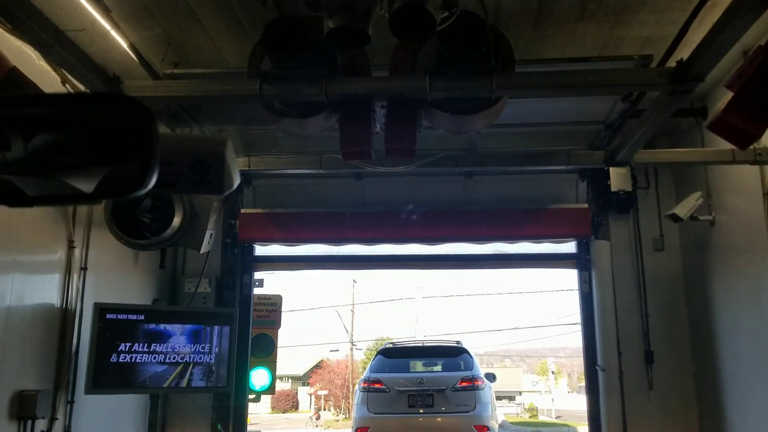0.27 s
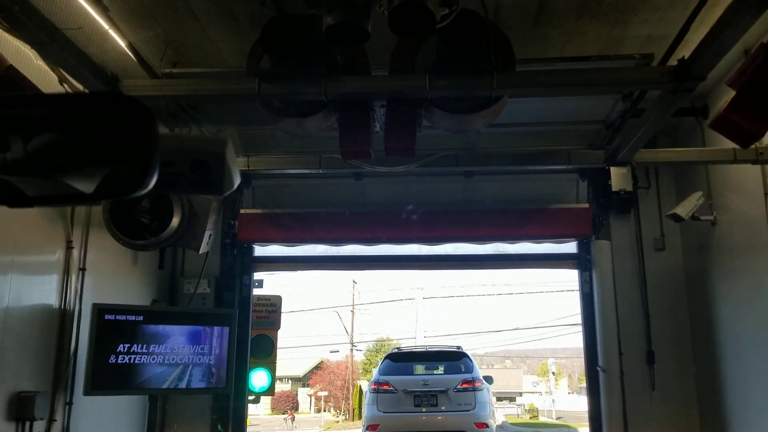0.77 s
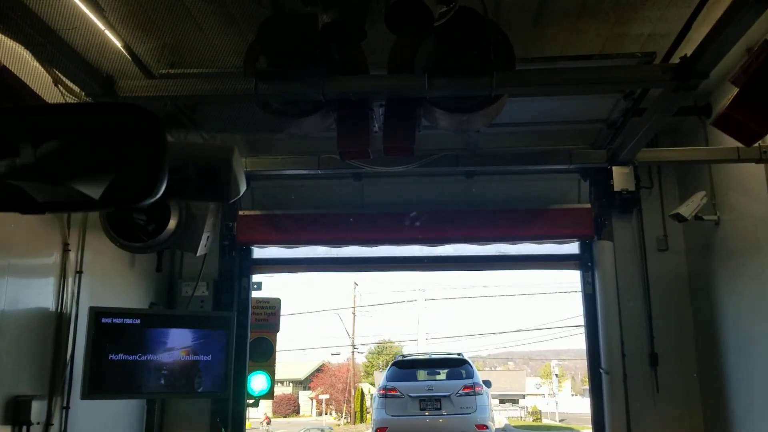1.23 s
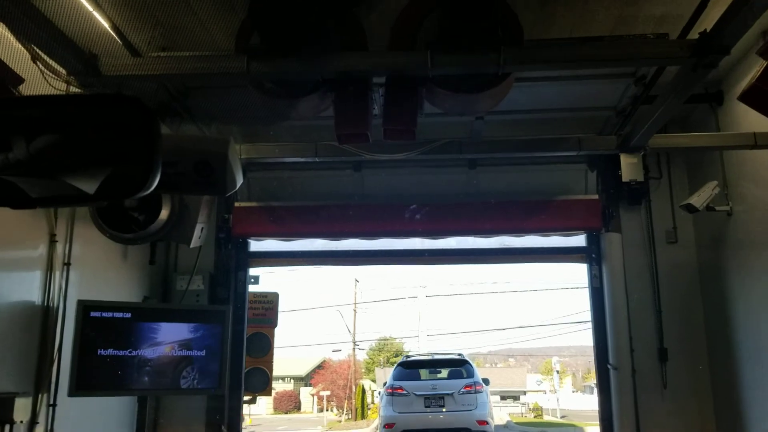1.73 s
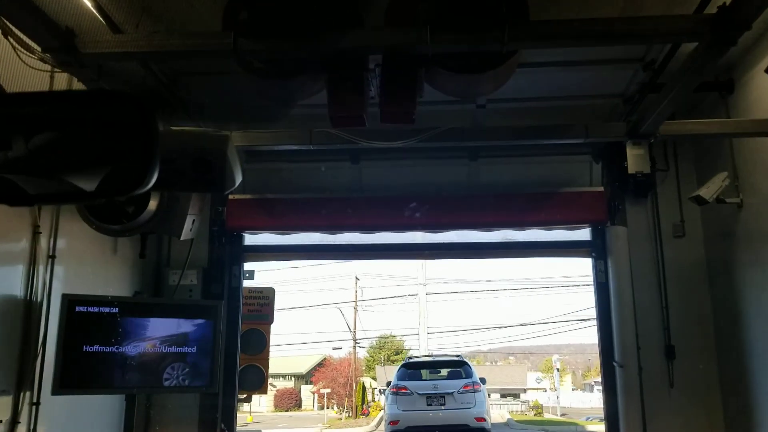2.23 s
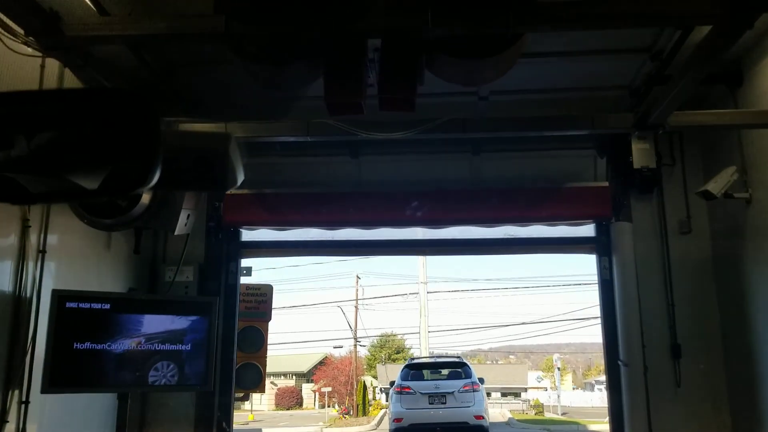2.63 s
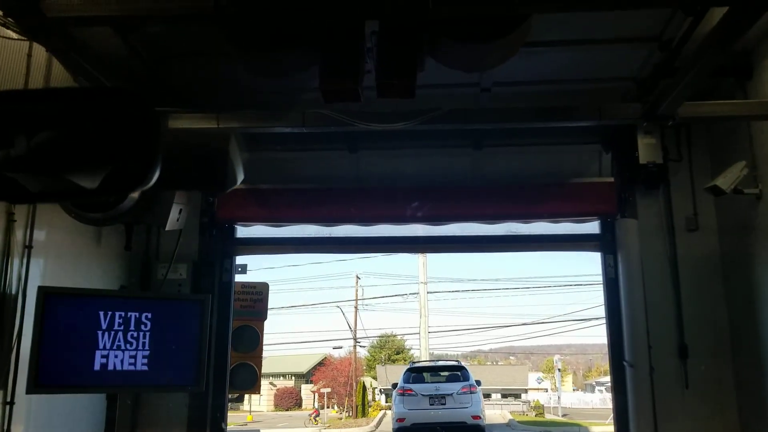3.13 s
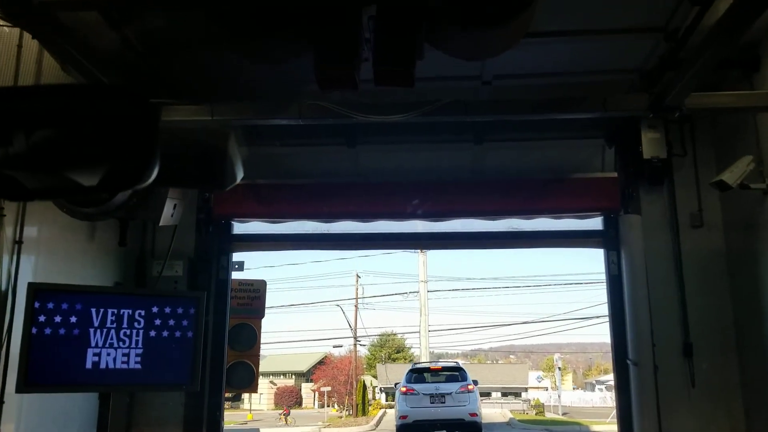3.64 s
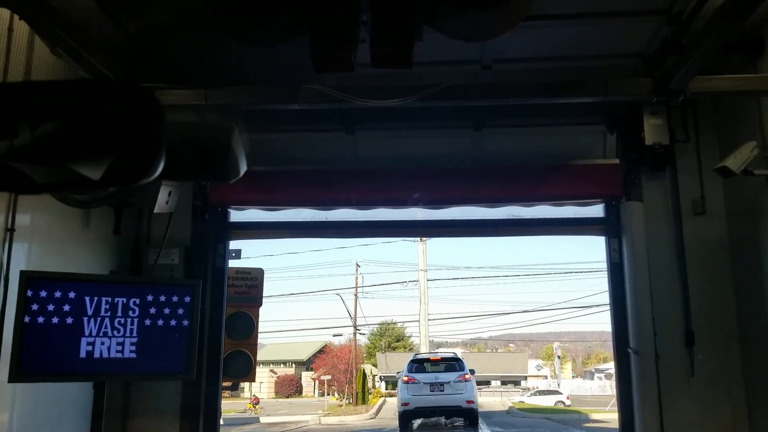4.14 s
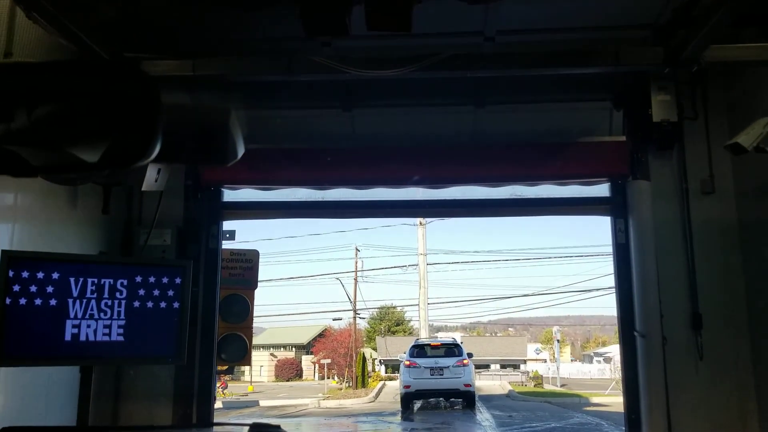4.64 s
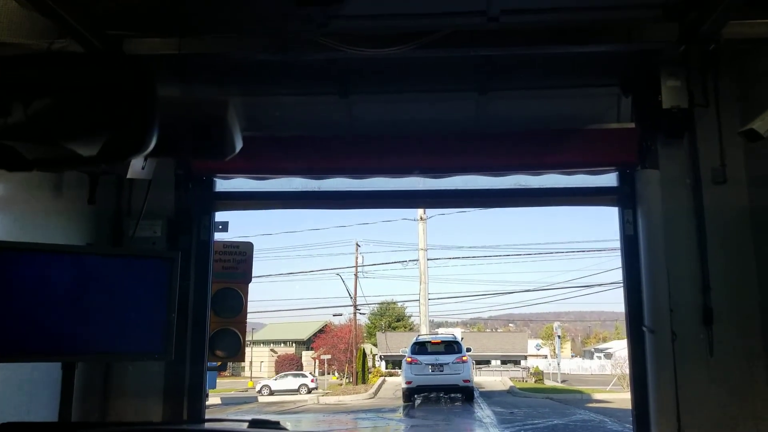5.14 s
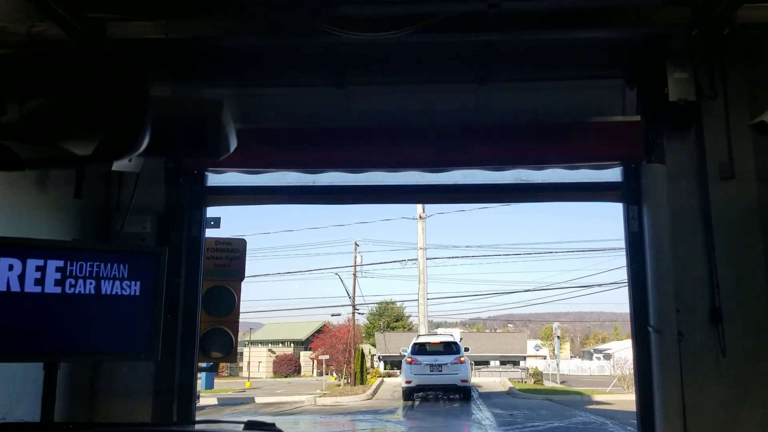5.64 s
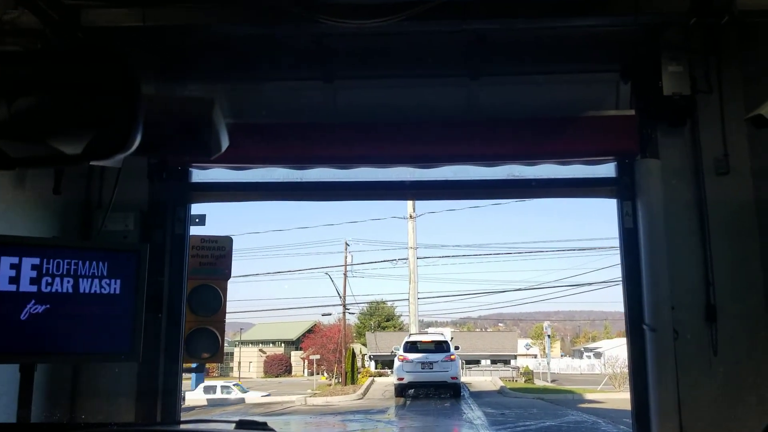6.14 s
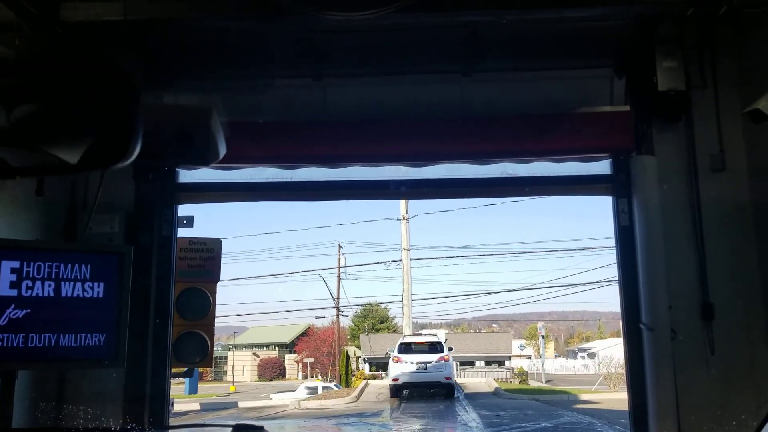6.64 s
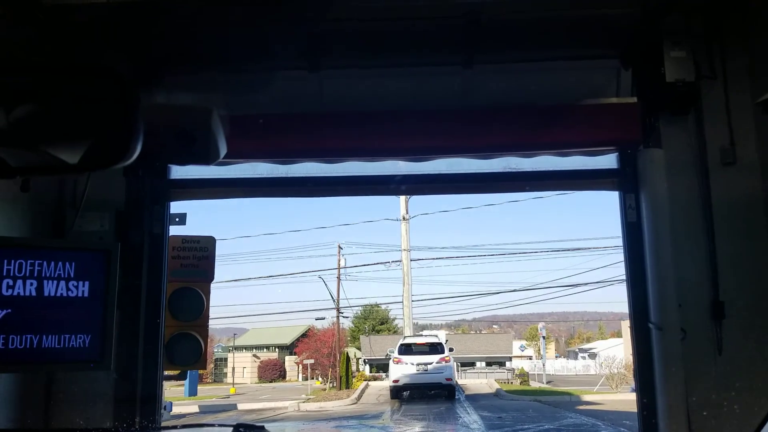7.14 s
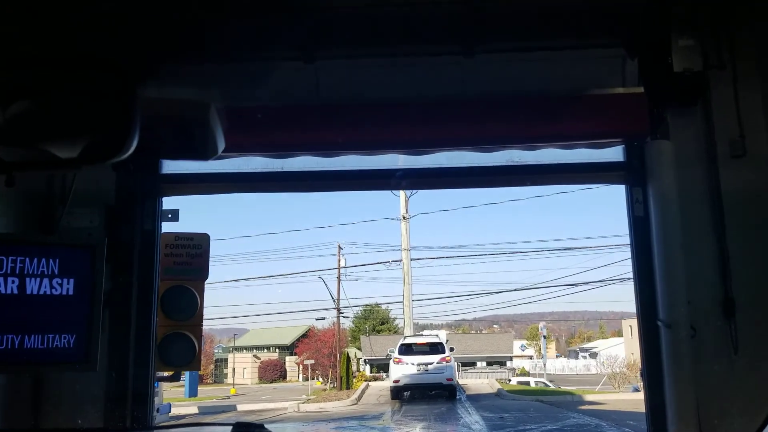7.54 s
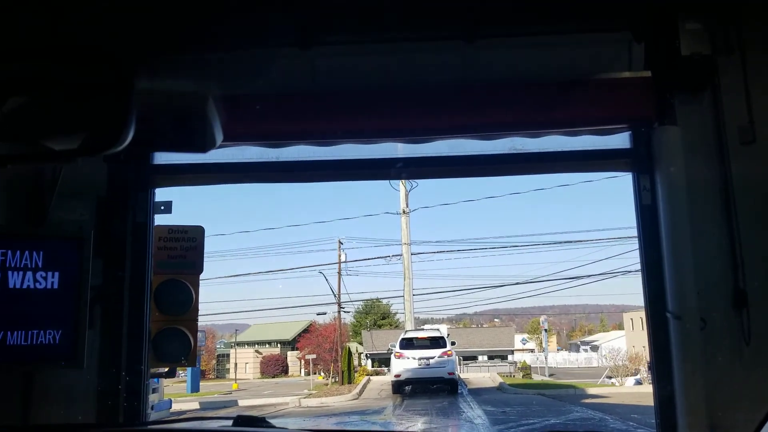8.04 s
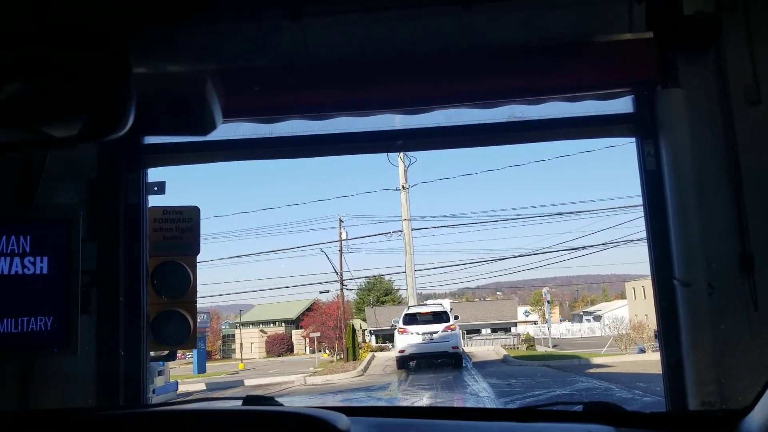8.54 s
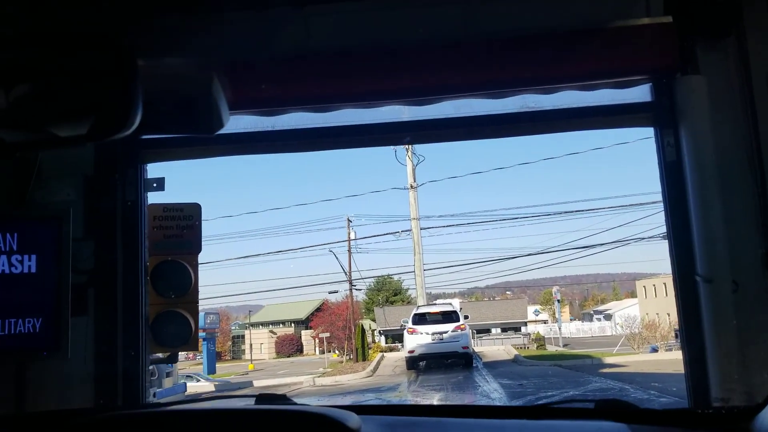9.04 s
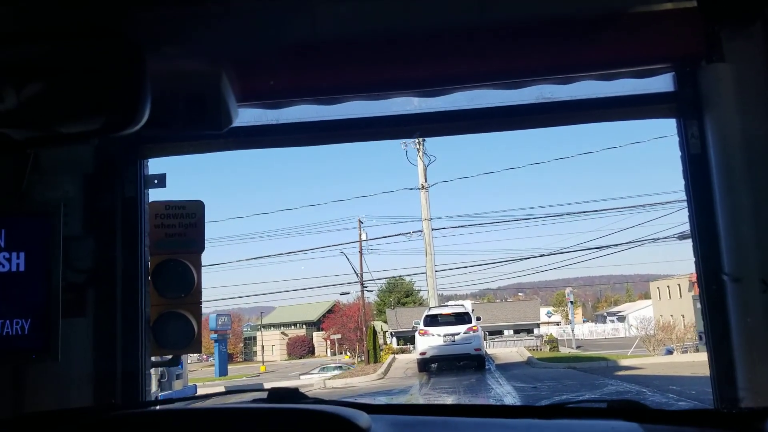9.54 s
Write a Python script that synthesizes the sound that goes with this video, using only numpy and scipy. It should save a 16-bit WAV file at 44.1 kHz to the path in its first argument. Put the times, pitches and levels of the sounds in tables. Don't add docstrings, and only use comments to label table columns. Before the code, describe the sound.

Heard inside a car creeping out of a wash tunnel: deep turbulent dryer air booms and drums on roof and glass, with a pulsing mid-low fan hum and faint droplet hiss. Loose keys tinkle. Small knocks lead to a hard thump just past five seconds, after which the sound dips and recovers. Keys jingle in a flurry, then final jolts rattle the body. Close, enclosed phone microphone on the dashboard.

```python
import sys
import numpy as np
from scipy import signal
from scipy.fft import rfft, irfft, next_fast_len
from scipy.io import wavfile
from scipy.ndimage import uniform_filter1d

SR = 44100
rng = np.random.default_rng(int(sys.argv[2]) if len(sys.argv) > 2 else 0)


def digitize_waveform(pressure):
    field = np.atleast_2d(pressure).T
    bounded = np.clip(field, -1, 1)
    quanta = np.round(bounded * 32767).astype(np.int16)
    wavfile.write(sys.argv[1], SR, quanta)


def level_to_linear(level):
    exponent = np.asarray(level, float) / 20
    return 10 ** exponent


N = 431738
TIME = np.arange(N) / SR


def curves(table):
    s, *columns = np.transpose(table)
    return [np.interp(TIME, s, column) for column in columns]


def over_hz(table, hz, column=1):
    rows = np.transpose(table)
    return np.interp(np.log(hz + 1), np.log(rows[0] + 1), rows[column])


def unit(x):
    return x / np.sqrt(np.mean(x ** 2))


def band(x, lo_hz, hi_hz):
    return signal.sosfilt(signal.butter(2, [lo_hz, hi_hz], "band", fs=SR, output="sos"), x)


def lowpass(x, cutoff_hz):
    return signal.sosfilt(signal.butter(3, cutoff_hz, fs=SR, output="sos"), x)


def walk(rate_hz):
    hold = int(SR / rate_hz)
    steps = np.repeat(rng.standard_normal(N // hold + 1), hold)
    slewed = uniform_filter1d(uniform_filter1d(steps, hold), hold)
    return unit(slewed[:N])


def humps(rows):
    coarse = TIME[::64]
    total = sum(gain * np.exp(-((coarse - s) / length) ** 2) for s, gain, length in rows)
    return np.interp(TIME, coarse, total)


def ring(x, hz, t60):
    pole = np.exp(2j * np.pi * hz / SR - np.log(1000) / (t60 * SR))
    return signal.lfilter([1], [1, -pole], x).imag


def ports(x, lean_db):
    late = np.interp(TIME - .0001, TIME, x)
    return np.array([x * level_to_linear(lean_db / 2), late * level_to_linear(-lean_db / 2)])


# start_s, depth_db, hold_s, recovery_s
DUCKS = [
    (-.5, -6.5, 0.84, 1.74),
    (5.31, -9.5, 0.91, 0.85),
]


def duck_db():
    attack_s = 0.19
    return sum(np.interp(TIME - s, np.cumsum([0, attack_s, hold, back]), [0, db, db, 0])
               for s, db, hold, back in DUCKS)


# time_s, roof_force_db, windscreen_aim_db, cabin_mode_hz
BLAST = [(0, 0, 0, 126), (.9, -1, 0, 125), (1.15, 1, 1, 125.8), (1.6, -0.5, 3, 129.4),
         (2.3, -0.5, 3, 137.5), (2.9, 1.5, 1, 150), (3.5, 1.5, -1, 161.2), (4.2, 3, -2.5, 149.3),
         (4.7, 0, -1, 150.1), (5.3, -0.5, -2, 152), (5.6, 0, 1, 142), (6.2, 0.5, 0, 142.6),
         (6.85, 1, 1.5, 148.1), (7.1, 0, 2, 156), (7.4, 0.5, 1, 165), (8.1, 0.5, 0.5, 166),
         (8.8, 1.5, -2, 162), (9.4, 0, -0.5, 160), (9.79, 0.5, 0, 168)]
# roof_force_db_per_db, windscreen_aim_db_per_db, gain_control_db_per_db
ANSWER = [
    (-.3, 0.94, 0.76),
    (0.36, 0.19, 0.88),
    (2.2, 0.075, 0.63),
    (0.89, 1, 0.51),
]


def regions_db():
    force, aim, _ = curves(BLAST)
    return np.array(ANSWER) @ np.array([force, aim, duck_db()])


# start_s, peak_db, left_minus_right_db
KEY_HITS = [(1.0306, -48, 4.5), (1.3453, -50.5, -3.5), (1.506, -50.5, -10), (2.2553, -46, -2),
            (2.3191, -37.5, -1), (2.678, -43.5, 0), (2.6903, -38.5, -1), (2.7357, -46.5, -3),
            (2.8933, -52, -2.5), (2.9342, -48, 3.5), (3.7648, -46.5, 3), (3.8492, -45, 2), (3.868, -49, 4),
            (3.888, -45, 0.5), (4.137, -45, -1), (4.4608, -54, -2.5), (4.775, -49, 0.5), (5.1612, -46, 3),
            (4.557, -47, -5.5), (4.614, -50.5, 9.5), (4.8075, -46, -2), (4.8339, -42, 3),
            (4.8748, -46, 3.5), (4.899, -44, -1), (5.6331, -45.5, -6), (5.6575, -44, -2),
            (6.5585, -50.5, 6), (7.1801, -41, 2), (7.195, -42, 1.5), (7.225, -46, 2), (7.33, -58, -1),
            (7.3881, -45, 1.5), (7.445, -50, 2), (7.4935, -53, 1), (7.5168, -42, -1.5), (7.533, -45, -1),
            (7.5887, -38.5, 0.5), (7.602, -42, -1), (7.634, -47, 0.5), (7.8511, -48, 2.5), (7.885, -48, 2),
            (7.93, -48, 0), (7.9902, -46, -1.5), (8.6986, -45, 1), (9.5766, -43, 6)]
# pitch_hz, level_db, t60_s
KEY_MODES = [(10700, -1, .008), (11600, -2, .008), (12200, 0, .008), (13000, -3, .006), (14000, -5, .005)]
# centre_s, level_db, length_s, pitch_hz
SQUEAKS = [(3.935, -62, .03, 10956), (3.98, -57, .025, 10956), (4.015, -63, .02, 10956),
           (4.06, -58, .015, 7200), (3.785, -58, .01, 8150), (3.865, -58, .008, 8200),
           (7.34, -57, .006, 8200), (7.635, -57, .006, 8200), (7.715, -56, .006, 8200),
           (7.755, -56, .008, 8200), (7.828, -55, .005, 8200), (7.855, -56, .005, 8200),
           (7.882, -55, .005, 8200)]


def keys():
    rattle_s, tick_db = .014, -16
    out = np.zeros((2, N))
    age = np.arange(SR // 10) / SR
    for s, db, lean_db in KEY_HITS:
        touches = rng.standard_normal((2, len(age))) * np.exp(-age / rattle_s)
        touches = touches * (rng.random(len(age)) < .08)
        touches[:, 0] = 1.5
        chime = sum(level_to_linear(g) * ring(touches, f * (1 + .008 * rng.standard_normal()), t60)
                    for f, g, t60 in KEY_MODES)
        hit = 1.8 * chime / np.abs(chime).max() + level_to_linear(tick_db) * band(touches, 5500, 15500)
        hit = hit * level_to_linear(db + np.array([[.5], [-.5]]) * lean_db)
        i = int(s * SR)
        out[:, i:i + len(age)] += hit[:, :N - i]
    squeaks = np.zeros(N)
    middle = age[-1] / 2
    for s, db, length, hz in SQUEAKS:
        i = int((s - middle) * SR)
        swell = level_to_linear(db) * np.exp(-((age - middle) / length) ** 2)
        squeaks[i:i + len(age)] += swell * np.sin(2 * np.pi * hz * TIME[i:i + len(age)])
    return out + ports(squeaks, .1)


# start_s, peak_db, rattle_s, contact_hardness_hz, scrape_db
JOLTS = [(4.461, -28, .008, 2400, -33), (4.557, -25, .012, 2400, -33), (4.711, -29, .01, 1500, -40),
         (4.787, -18, .012, 480, -51), (4.803, -19, .02, 520, -51), (5.291, -11, .008, 1700, -36),
         (5.302, -6.5, .016, 1300, -38), (5.316, -14, .014, 2000, -31), (5.330, -13, .014, 2300, -29),
         (5.349, -14, .016, 1200, -31), (5.364, -17, .02, 750, -36), (5.392, -20, .03, 540, -42),
         (5.426, -26, .03, 430, -45), (9.3, -24, 0.03, 700, -44.5), (9.627, -21, .03, 500, -47),
         (9.665, -21, .02, 800, -47), (9.688, -13, .01, 1000, -47), (9.701, -11, .013, 900, -47),
         (9.715, -14, .012, 1300, -47), (9.737, -13, .015, 1000, -45), (9.757, -14, .016, 850, -45),
         (9.775, -19, .015, 700, -47)]
# pitch_hz, level_db, t60_s
BODY = [(270, -18, .03), (370, -9, .03), (560, 1, .03), (700, -4, .03), (880, -4, .03), (1060, -6, .025),
        (1280, -10, .018), (1540, -10, .022), (1820, -12, .016), (2150, -13, .016), (2660, -21, .015)]


def jolts():
    out = np.zeros((2, N))
    age = np.arange(SR // 3) / SR
    for s, db, length, contact_hz, scrape_db in JOLTS:
        knocks = rng.standard_normal((2, len(age))) * (rng.random(len(age)) < .3)
        knocks[:, :16] = 0.2
        knocks[1] = 0.31 * knocks[0] + .5 * knocks[1]
        decay = np.exp(-(age / length) ** 2.4) + .3 * np.exp(-age / (1.4 * length))
        shape = np.minimum(.5 + age / .006, 1) * decay
        panels = sum(level_to_linear(g) * ring(knocks * shape, f * (1 + 0.024 * rng.standard_normal()), t60) / np.sqrt(t60)
                     for f, g, t60 in BODY)
        panels = lowpass(panels, contact_hz)
        peak = np.abs(band(panels.mean(axis=0), 500, 1500)).max()
        scrape = level_to_linear(scrape_db) * shape * unit(band(rng.standard_normal((2, len(age))), 2200, 6600))
        hit = level_to_linear(db) * (1.25 * panels / peak + scrape)
        i = int(s * SR)
        out[:, i:i + len(age)] += hit[:, :N - i]
    return out


# pitch_hz, level_db
SPRAY_COLOUR = [(5000, -28.5), (7000, -15.5), (8200, -2), (10000, -5.5), (11800, -3), (13500, -7.5),
                (15700, -7.5)]


def spray(jets_db):
    level_db, shaken_db, shaken_s = -56.5, 32, .018
    size = next_fast_len(N)
    drops = (rng.random((2, N)) < .3) * rng.standard_normal((2, N))
    drops = drops * level_to_linear(1.6 * rng.exponential(size=(2, N)))
    hz = np.arange(size // 2 + 1) * SR / size
    colour = level_to_linear(over_hz(SPRAY_COLOUR, hz)) * (hz > 4000)
    hiss = unit(irfft(rfft(drops, size) * colour, size)[:, :N])
    shakes = [(s, db - shaken_db) for s, db, _ in KEY_HITS]
    shakes += [(s + length / 2, db + scrape_db - 20.0) for s, db, length, _, scrape_db in JOLTS]
    shed = humps([(s + shaken_s / 2, level_to_linear(db), shaken_s) for s, db in shakes])
    steady = level_to_linear(level_db + 0.91 * jets_db + .3 * walk(3))
    return hiss * (steady + shed) * level_to_linear(.6 * walk(60) + np.array([[1.1], [-1.1]]))


# centre_s, level_db, length_s
IN_STEP = [(0.126, -29.5, 0.096), (0.494, -32, 0.62), (1.122, -26, 0.12), (1.36, -30, 0.089),
           (1.7, -19.5, 0.082), (2.157, -25, 0.15), (2.61, -22.5, 0.069), (2.98, -18, 0.14),
           (3.394, -18, 0.051), (3.622, -24.5, 0.025), (3.947, -24, 0.015), (4.19, -21, 0.036),
           (4.598, -22, 0.098), (4.986, -32.5, 0.16), (5.253, -24.5, 0.12), (5.747, -35.5, 0.14),
           (6.31, -32.5, 0.15), (6.707, -27, 0.15), (7.053, -24, 0.11), (7.296, -19, 0.073),
           (7.477, -18.5, 0.014), (7.71, -19.5, 0.11), (8.146, -25.5, 0.097), (8.375, -19, 0.01),
           (8.46, -20, 0.016), (8.606, -24, 0.033), (8.99, -31, 0.068), (9.383, -23, 0.1),
           (9.716, -23, 0.097)]


def blade_tone():
    blade_hz, between_swells_db = 468.5, -36
    phase = 2 * np.pi * np.cumsum(blade_hz + 1.164 * walk(4)) / SR + 0.38 * walk(8)
    size = level_to_linear(between_swells_db + 0.36 * duck_db() + 1.8 * walk(7.6))
    size = size + humps([(s, level_to_linear(db), length) for s, db, length in IN_STEP])
    overtone = level_to_linear(-28 + 2 * walk(6)) * np.sin(2 * phase)
    tone = np.sqrt(2) * size * (np.sin(phase) + overtone)
    half = uniform_filter1d(size, size=SR // 2) * level_to_linear(-4.0 + 2.4 * walk(3.2)) * np.sin(phase / 2)
    return ports(tone + half, 1.1)


def cabin_boom(boom_db):
    width_hz, level_db = 38.5, -19.5
    sway = lowpass(rng.standard_normal((2, N)), width_hz / 2)
    phase = 2 * np.pi * np.cumsum(curves(BLAST)[2]) / SR
    mode = unit(sway[0] * np.cos(phase) + sway[1] * np.sin(phase))
    return ports(mode * level_to_linear(level_db + 2.8 * boom_db), .1)


# pitch_hz, density_db_per_hz
ROAR = [(13, -41.5), (22, -6.5), (124, -4), (240, -5), (401, -7.5), (465, -9.5), (623, -17.5), (795, -23),
        (920, -20.5), (1090, -26), (1360, -29), (2380, -37.5), (4720, -41.5), (7500, -55.5), (9750, -84.5),
        (16500, -120)]
# pitch_hz, width_hz, lift_db
CABIN = [(117.3, 9, 8), (176, 33, 2.5), (228.6, 36, 2.5), (268.3, 12.5, 4.5), (536, 79, 4), (850, 65, -0.5),
         (1340, 110, 2.5)]
# pitch_hz, shared_part_0_to_1, left_lead_rad
ALIKE = [(30, .995, 0), (60, .975, 0), (130, .96, .02), (215, .86, .1), (390, .77, .5), (550, .7, .4),
         (680, .25, 1.5), (1100, .38, 3.0), (1500, .27, 3.1), (1900, .05, 3.1)]
# pitch_hz, left_minus_right_db
LEAN = [(60, 2), (110, 0), (200, 0), (380, 2.5), (700, 1.5), (1290, -0.5), (2380, -4), (4400, 0), (8120, 2),
        (15000, 3.5)]


def air_blast(regions):
    size = next_fast_len(N)
    hz = np.arange(size // 2 + 1) * SR / size
    colour_db = over_hz(ROAR, hz) + sum(db / (1 + (2 * (hz - f) / w) ** 2) for f, w, db in CABIN)
    shared, left, right = rfft(rng.standard_normal((3, size)))
    alike = np.clip(over_hz(ALIKE, hz), 0, 1)
    lag = np.exp(-1j * over_hz(ALIKE, hz, column=2))
    pair = np.sqrt(alike) * np.array([shared, shared * lag])
    pair = pair + np.sqrt(1 - alike) * np.array([left, right])
    pair = pair * level_to_linear(colour_db + np.outer([.5, -.5], over_hz(LEAN, hz)))
    swing = regions - regions.mean(axis=1, keepdims=True)
    region_hz = np.log([55, 140, 330, 1100])
    gust, out = walk(4.9), 0
    for centre in 20 * 2 ** (np.arange(19) / 2):
        mask = np.cos(np.pi / 2 * np.clip(2 * np.log2((hz + 1) / centre), -1, 1)) ** 2
        place = np.interp(np.log(centre), region_hz, np.arange(4))
        k = min(int(place), 2)
        follow = swing[k] + (place - k) * (swing[k + 1] - swing[k])
        flutter = np.interp(np.log(centre), np.log([300, 3000, 10000]), [.1, .5, .9])
        move_db = follow + flutter * (0.55 * gust + 1.0 * walk(25))
        out = out + irfft(pair * mask, size)[:, :N] * level_to_linear(move_db)
    return unit(out) * level_to_linear(-13.0)


def scene():
    regions = regions_db()
    details = keys() + jolts() + spray(regions[3])
    return details + blade_tone() + cabin_boom(regions[1]) + air_blast(regions)


def band_limit(x):
    return signal.sosfilt(signal.butter(12, 15780, fs=SR, output="sos"), x)


def record(dry):
    knee = 1.2
    mix = signal.sosfilt(signal.butter(4, 35, "high", fs=SR, output="sos"), dry)
    mix = np.clip(knee * np.tanh(mix / knee), -1, 1)
    return band_limit(mix)


dry = scene()
out = record(dry)
digitize_waveform(out)
```